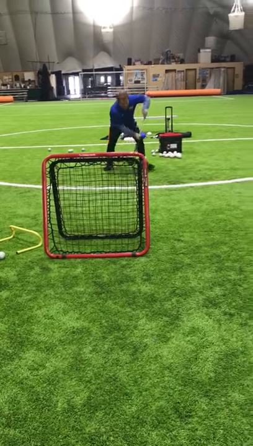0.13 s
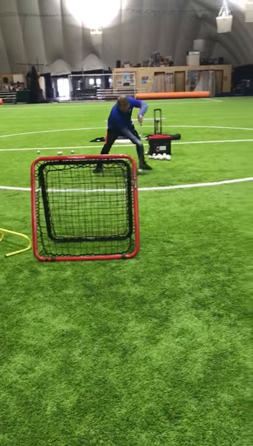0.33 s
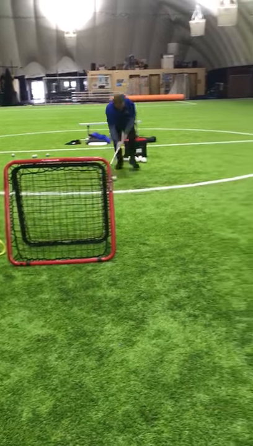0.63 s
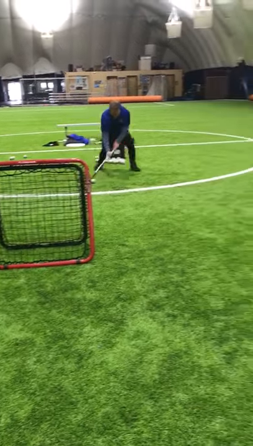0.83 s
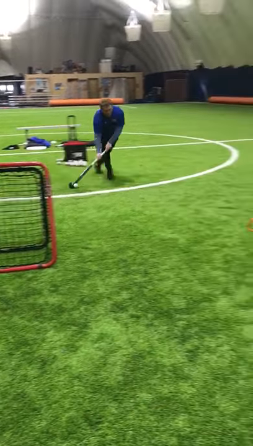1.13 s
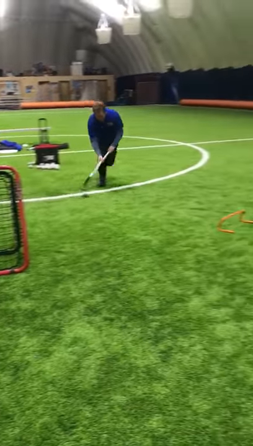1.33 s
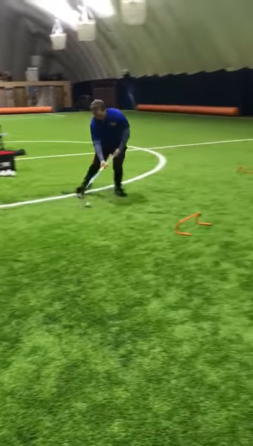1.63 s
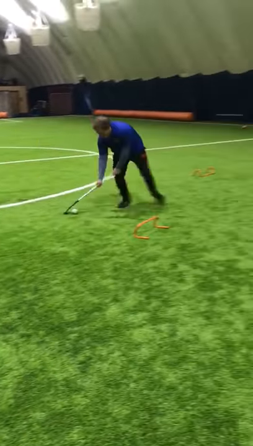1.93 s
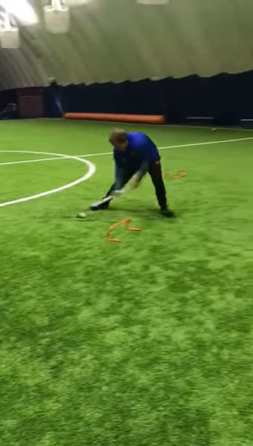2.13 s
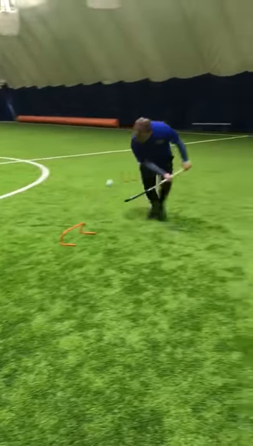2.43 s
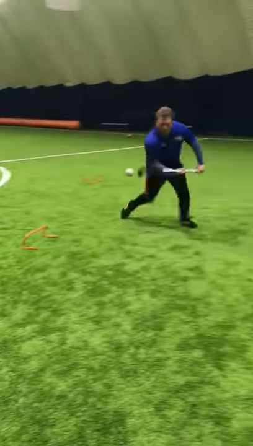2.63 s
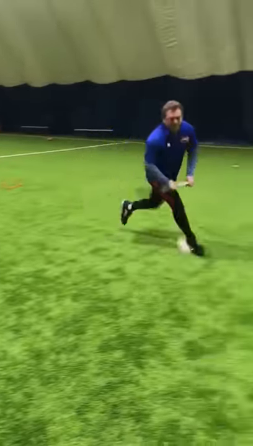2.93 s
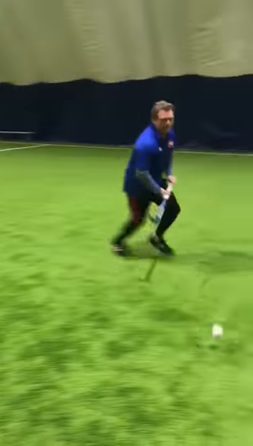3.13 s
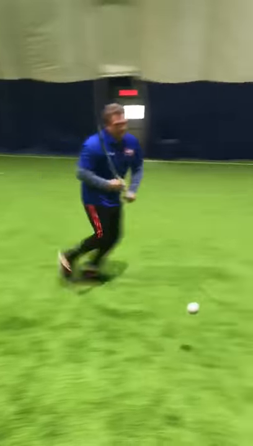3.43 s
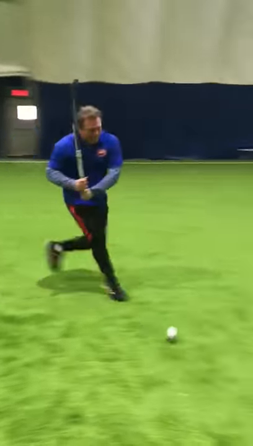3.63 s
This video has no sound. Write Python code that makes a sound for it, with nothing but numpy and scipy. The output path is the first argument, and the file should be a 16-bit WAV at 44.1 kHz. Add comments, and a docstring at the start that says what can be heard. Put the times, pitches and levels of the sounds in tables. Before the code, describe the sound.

A hockey stick hits a hard ball on turf: a loud crack early, then two weaker knocks, with light ticks and brushing between, echoing in a large air dome, one microphone, low blower rumble.

```python
"""Inside a large air dome, one microphone hears a player dribble a hard ball with a hockey stick on turf.
Three sharp knocks, built from a snap, noise and ringing modes, return from the roof as a slap and long tail.
Stick, ball and shoes tick, thump, brush and scuff in bursts of shaped noise, clicks and small resonances.
Small metal parts jingle briefly at first. Filtered noise gives the ventilation's steady rumble
and a soft hiss that fades early and swells toward the end."""
import sys
import numpy as np
from scipy import signal
from scipy.fft import rfft, irfft, next_fast_len
from scipy.io import wavfile

SR = 44100
rng = np.random.default_rng(int(sys.argv[2]) if len(sys.argv) > 2 else 0)


def int16_out(signal):
    """Quantize to a 16-bit WAV file."""
    q = np.round(np.clip(np.atleast_2d(signal).T, -1, 1) * 32767)
    wavfile.write(sys.argv[1], SR, q.astype(np.int16))


N = 166698
T = np.arange(N) / SR   # time, s
PADDED = 2 * next_fast_len(N)
HZ = np.maximum(np.fft.rfftfreq(PADDED, 1 / SR), 1)


def knocks():
    """Stick on ball: each contact is a snap, a short crack, a thud and ringing modes, answered by the dome."""
    # the contacts: start_s, level_db, crack_db, thud_db, roof_echo_delay_s, echo_db, tail_db
    contacts = [(.4063, -21, 6, -5.5, 0.049, -4, -12.5), (1.6318, -36.5, -4, -31, 0.045, -3.5, -30),
                (2.3327, -29.5, -2, -4, 0.047, -15.5, -27)]
    # stick and ball ring differently with the point of contact:
    # pitch_hz, t60_s, first_knock_db, second_knock_db, third_knock_db
    stick_modes = [(391, 0.021, -5.5, -31, -4), (640, 0.026, -5.5, -28, -8), (733, 0.036, -6, 1.5, -0.5),
                   (871, 0.021, -2, 0, 4), (1195, 0.042, -22, -7.5, -6.5), (1275, 0.012, 2, 1.5, -1.5),
                   (1420, 0.029, 0.5, -5, 0.5), (1400, 0.017, -22, -23, -11), (1680, 0.015, -4, -11, -14),
                   (1970, 0.016, -9.5, -13, -4.5), (2380, 0.028, -23, -18, -10.5),
                   (2685, .016, -10, -18, -12), (3110, 0.02, -13.5, -26, -25), (3360, 0.02, -18, -17, -4.5),
                   (4000, 0.016, -26, -27, -17), (5170, 0.021, -16, -32, -37),
                   (5740, 0.0059, -10, -15, -18), (6400, 0.0094, -7.5, -7.5, -7),
                   (9150, 0.0043, -4, -12, -22), (2480, 0.015, -19, -24, -31),
                   (3700, 0.0084, -23, -13, -30), (4610, 0.0099, -33, -22, -29),
                   (10900, 0.0038, -22, -10, -32)]
    # colour of the crack noise: freq_hz, level_db (per Hz)
    crack_colour = [(500, -14), (1500, -9), (2600, -1), (4000, -1), (6000, -4), (9500, -22), (11000, -14.5),
                    (12500, -3)]
    slap, tail = roof_slap(), dome_tail()
    out = 0
    for k, (start_s, level_db, crack_db, thud_db, echo_s, echo_db, tail_db) in enumerate(contacts):
        body = 0
        for m, (hz, t60_s, *mode_dbs) in enumerate(stick_modes):
            body = body + (-1) ** m * from_db(mode_dbs[k]) * ring(hz, t60_s)   # alternating polarity
        snap = from_db(9) * ring(hz=6200, t60=0.00021)
        noise = from_db(-4.5) * coloured(crack_colour) * dying(t60=0.012)
        crack = snap + noise
        crack = crack + from_db(-15) * delayed(crack, s=.003)   # bounce off the ground
        thud = ring(hz=271, t60=0.028)
        knock = from_db(level_db) * (body + from_db(crack_db) * crack - from_db(thud_db) * thud)
        dome = from_db(echo_db) * slap + from_db(tail_db) * tail
        room = through(knock, dome)
        out = out + delayed(knock, start_s) + delayed(room, start_s + echo_s)
    return out


def roof_slap():
    """The curved roof returns a smeared echo, and a duller one after a bounce on the turf."""
    # colour of the echo: freq_hz, level_db
    slap_colour = [(200, -18), (500, 0), (700, -8), (900, 7), (1200, 3), (1450, -9), (2000, -4),
                   (3000, -8.5), (6000, -4), (12000, -14)]
    # how long the smear rings: freq_hz, t60_s
    slap_ring = [(300, 0.19), (1000, 0.16), (2500, 0.17), (5000, 0.086), (10000, 0.057)]
    first_rise_s, second_rise_s = 0.002, 0.014
    first = scatter(slap_colour, 1 - np.exp(-T / first_rise_s), slap_ring)
    second = scatter(slap_colour, (1 - np.exp(-T / second_rise_s)) ** 2, slap_ring)
    # the turf swallows the treble above 3000 Hz
    second = signal.sosfilt(signal.butter(1, 3000, fs=SR, output="sos"), second)
    return first + from_db(-10.5) * delayed(second, s=.074)


def dome_tail():
    """Long reverberation of the dome; the far wall adds a late swell."""
    # colour of the tail: freq_hz, level_db
    tail_colour = [(200, -9), (500, 1), (900, 5.5), (1100, 10), (1400, -2), (1650, -1), (2500, -5),
                   (5000, -11), (12000, -32)]
    # how long the dome rings: freq_hz, t60_s
    tail_ring = [(200, 0.67), (1000, 2.17), (3000, 1.25), (10000, .7)]
    rise_s = 0.048
    swell = 1 - np.exp(-T / rise_s)
    far_wall = from_db(4) * delayed(swell, s=0.16)
    return scatter(tail_colour, swell + far_wall, tail_ring)


def ticks():
    """Light contacts of stick, ball and shoes: a short burst of bright grit and a small hollow clack."""
    # the contacts, with levels before the trims below: start_s, grit_db, clack_db, t60_s
    touches = [(.417, -47, -41, 0.035), (.4345, -37, -45, 0.0061), (.4438, -46, -52, 0.0058),
               (.8975, -50, -62, .006), (1.6418, -40, -41, 0.0064), (1.651, -46, -43, 0.0056),
               (1.7505, -54, -42, 0.0091), (2.160, -42, -36.5, 0.0063), (2.170, -44, -45, 0.014),
               (2.178, -49, -44, .014), (2.349, -63, -42, .012), (2.511, -51, -59, 0.013),
               (2.823, -45, -47, 0.0071), (2.842, -53, -56, .008), (3.1105, -43, -38.5, 0.015),
               (3.210, -50.5, -75, 0.031), (3.470, -55, -41.5, 0.0078), (3.704, -40.5, -47.5, 0.019),
               (3.7455, -47, -42.5, 0.013)]
    # colour of the grit: freq_hz, level_db (per Hz)
    grit_colour = [(1000, -12), (3000, -13), (6500, 4), (10000, -2.5), (12500, -0.5)]
    # hollow resonances: pitch_hz (before a small random detuning), level_db
    clack_modes = [(1000, -6), (1850, -2), (2520, -2), (3400, -3), (4200, -6)]
    grit_trim_db, clack_trim_db = -7, -6
    grit = from_db(grit_trim_db) * coloured(grit_colour)
    out = 0
    for start_s, grit_db, clack_db, t60_s in touches:
        clack = 0
        for m, (hz, mode_db) in enumerate(clack_modes):
            mode = ring(hz * rng.uniform(0.95, 1.04), t60_s)
            clack = clack + (-1) ** m * from_db(mode_db + clack_trim_db) * mode
        out = out + grit * delayed(from_db(grit_db) * dying(t60_s), start_s)
        out = out + delayed(from_db(clack_db) * clack, start_s)
    return out


def thumps():
    """Ball or foot lands softly on the turf: dull puffs of noise that die away."""
    # the landings: start_s, level_db, t60_s
    landings = [(0.434, -43, 0.047), (2.159, -45.5, 0.062), (2.213, -48.5, 0.14), (3.210, -47, 0.02),
                (3.743, -68, 0.075)]
    # colour of the puffs: freq_hz, level_db (per Hz)
    thump_colour = [(100, -12), (300, 0), (700, 2), (1400, -12), (3000, -16), (8000, -32)]
    puffs = sum(delayed(from_db(db) * dying(t60_s), start_s) for start_s, db, t60_s in landings)
    return coloured(thump_colour) * puffs


def brushes():
    """Stick and shoes brush the turf: plastic blades flick back at random, thousands a second."""
    # the strokes, each a bell-shaped swell: peak_s, level_db, rise_s, fall_s
    strokes = [(.57, -74, .05, 0.039), (.685, -61, 0.062, 0.035), (1.33, -69.5, 0.068, 0.031),
               (1.755, -62.5, 0.064, 0.037), (2.18, -65, 0.037, 0.021), (2.32, -54.5, 0.051, 0.072),
               (2.475, -61.5, 0.0099, 0.029), (2.553, -54, 0.01, 0.0072), (2.754, -62, 0.02, 0.011),
               (2.83, -76, 0.019, .03), (2.95, -69, 0.042, .04), (3.61, -76, .03, 0.024),
               (3.735, -64, 0.012, 0.046)]
    # colour of the flicks: freq_hz, level_db (per Hz)
    brush_colour = [(500, 19), (1500, 11.5), (3500, 5), (6500, 3), (10000, 3.5), (12500, -8.5)]
    blades_per_s, spread_db = 4100, 2
    struck = rng.random(N) < blades_per_s / SR
    strength = from_db(spread_db * np.minimum(rng.exponential(1, N), 4))
    flicks = struck * rng.choice([-1, 1], N) * strength
    level = 0
    for peak_s, db, rise_s, fall_s in strokes:
        width_s = np.where(T < peak_s, rise_s, fall_s)
        level = level + from_db(db) * np.exp(-.5 * ((T - peak_s) / width_s) ** 2)
    return coloured(brush_colour, flicks) * level


def scuffs():
    """Hollow scuffs on the turf: short rubs of noise that each sound in one broad resonance."""
    # the rubs, each a bell-shaped swell: peak_s, level_db, centre_hz, half_length_s
    rubs = [(1.74, -57, 650, 0.015), (2.5, -62.5, 620, 0.049), (2.705, -67, 2650, 0.035),
            (2.746, -58.5, 1350, 0.02), (2.746, -72, 3900, 0.014), (2.83, -56.5, 1360, 0.022)]
    out = 0
    for peak_s, db, hz, half_length_s in rubs:
        rub = signal.lfilter(*signal.iirpeak(hz, Q=6, fs=SR), rng.standard_normal(N))
        out = out + from_db(db) * rms_one(rub) * np.exp(-.5 * ((T - peak_s) / half_length_s) ** 2)
    return out


def jingle():
    """A short run of clattering touches on small metal parts, each with a faint high ring."""
    # the touches: start_s, clatter_db, bell_like_ring_db
    touches = [(.006, -53, -57), (0.026, -48, -70), (.038, -50, -72), (.051, -61, -59), (.080, -60, -65),
               (.101, -62, -65), (0.126, -71, -64), (.148, -70, -64), (.170, -70, -77), (.240, -92, -71)]
    # ringing of the metal: pitch_hz, level_db (before a random change at each touch), t60_s
    metal_modes = [(9550, -6.5, 0.086), (11000, -6, 0.075), (11350, -13, .06)]
    # colour of the clatter: freq_hz, level_db (per Hz)
    clatter_colour = [(600, -20), (1500, -26), (2700, 3), (3600, 5.5), (4330, 3.5), (4850, 3), (5350, 8),
                      (6500, -5), (8300, -4.5), (9500, -8), (11500, -11)]
    clatter = coloured(clatter_colour)
    out = 0
    for start_s, clatter_db, ring_db in touches:
        metal = 0
        for hz, mode_db, t60_s in metal_modes:
            metal = metal + from_db(ring_db + mode_db + rng.normal(0, 1.8)) * ring(hz, t60_s)
        out = out + clatter * delayed(from_db(clatter_db) * dying(t60=.06), start_s)
        out = out + delayed(metal, start_s)
    return out


def ventilation():
    """Steady blower rumble: noise weighted to the bass."""
    # colour of the rumble: freq_hz, level_db (per Hz)
    vent_colour = [(15, -35), (24, -43), (31, -11), (40, -0.5), (55, 3.5), (80, -4.5), (120, -6),
                   (165, -13.5), (250, -19.5), (340, -27.5), (500, -31.5), (900, -35), (1500, -43),
                   (3000, -51), (6000, -57.5), (12000, -66)]
    return from_db(-37.5) * coloured(vent_colour)


def soft_hiss():
    """Noise in bands that flutter independently; it fades at first and swells toward the end."""
    # level through time: time_s, level_db
    hiss_level = [(0, -52.5), (.3, -84), (1.2, -71.5), (2.1, -67.5), (2.6, -66), (2.78, -61), (3.0, -64),
                  (3.3, -61), (3.6, -58), (3.78, -55.5)]
    # colour of the hiss: freq_hz, level_db (per Hz)
    hiss_colour = [(200, 11.5), (450, -10), (650, 5.5), (1100, 3), (1450, 2.5), (2050, 0.5), (2600, -9),
                   (4000, -13.5), (7000, -24.5), (12000, -26)]
    edges_hz = np.geomspace(200, 12800, 13)
    hiss = 0
    for band in zip(edges_hz, edges_hz[1:]):
        band_filter = signal.butter(2, band, "band", fs=SR, output="sos")
        noise = signal.sosfilt(band_filter, rng.standard_normal(N))
        hiss = hiss + noise * flutter(db=2, per_s=25)
    level = from_db(np.interp(T, *np.transpose(hiss_level)))
    return level * coloured(hiss_colour, hiss)


def scatter(colour, swell, t60s):
    """Dense, uneven reflections that swell up and die away, each octave in its own time."""
    # reflections arrive in clumps
    rays = rng.choice([-1, 1], N) * swell * flutter(db=3, per_s=170)
    # unit energy with the decay at 1 kHz, before colouring
    rays = rays / np.sqrt(np.sum((rays * dying(at_hz(t60s, 1000))) ** 2))
    centres_hz = 250 * 2. ** np.arange(7)
    out = 0
    for hz, share in zip(centres_hz, np.eye(len(centres_hz))):
        # neighbouring octaves crossfade on the log-frequency axis
        octave = np.interp(np.log(HZ), np.log(centres_hz), share)
        out = out + rfft(rays * dying(at_hz(t60s, hz)), PADDED) * octave
    return irfft(out * from_db(at_hz(colour, HZ)))[:N]


def flutter(db, per_s):
    """A gain that wanders at random by some decibels."""
    knots = rng.standard_normal(N // 40)
    return from_db(db * np.interp(T * per_s, np.arange(len(knots)), knots))


def coloured(spectrum, source=None):
    """White noise, or a given source, shaped to a spectrum; rms 1."""
    source = rng.standard_normal(N) if source is None else source
    shaped = rfft(source, PADDED) * from_db(at_hz(spectrum, HZ))
    return rms_one(irfft(shaped)[:N])


def ring(hz, t60):
    """A struck mode: a sine under an exponential decay from 1."""
    return np.sin(2 * np.pi * hz * T) * dying(t60)


def dying(t60):
    """Exponential decay from 1, down 60 dB after t60 seconds."""
    return np.exp(-np.minimum(np.log(1000) * T / t60, 60))


def delayed(x, s):
    """The sound, starting s seconds later."""
    return np.concatenate([np.zeros(max(int(s * SR), 0)), x])[:N]


def through(x, response):
    """Pass a sound through an impulse response."""
    return signal.fftconvolve(x, response)[:N]


def at_hz(points, hz):
    """Read a table on a log-frequency axis."""
    f, v = np.transpose(points)
    return np.interp(np.log(hz), np.log(f), v)


def rms_one(x):
    """Scale to rms 1."""
    return x / np.sqrt(np.mean(x ** 2) + 1e-20)


def from_db(db):
    """Decibels to gain."""
    return 10 ** (np.asarray(db) / 20)


def scene():
    """All sources at one microphone."""
    play = knocks() + ticks() + thumps() + brushes() + scuffs() + jingle()
    background = ventilation() + soft_hiss()
    return (play + background)[None]


def record(dry):
    """A steep low-pass cuts the treble above 11900 Hz."""
    return signal.sosfilt(signal.ellip(10, .2, 80, 11900, fs=SR, output="sos"), dry)


dry = scene()
out = record(dry)
int16_out(out)
```